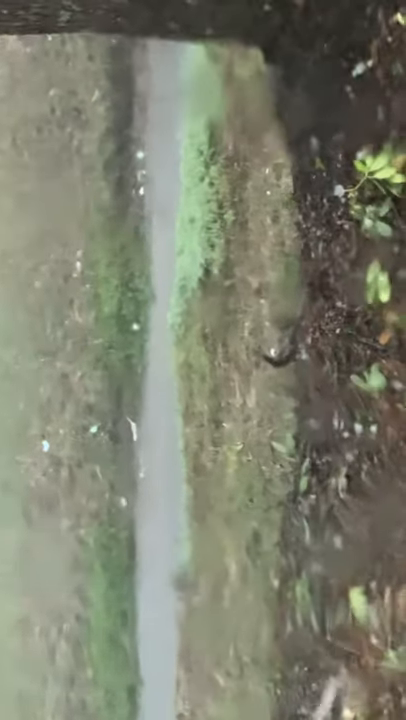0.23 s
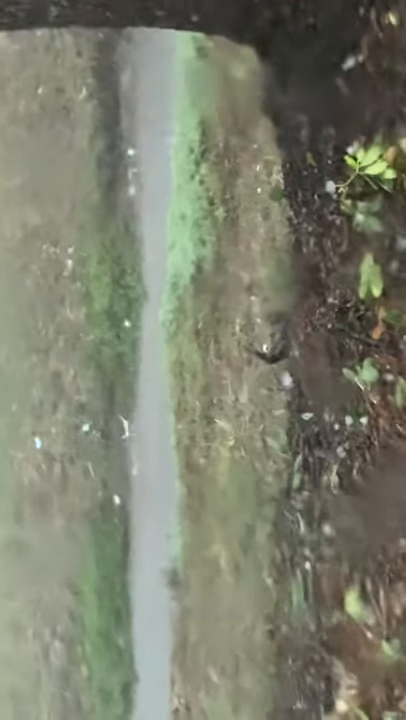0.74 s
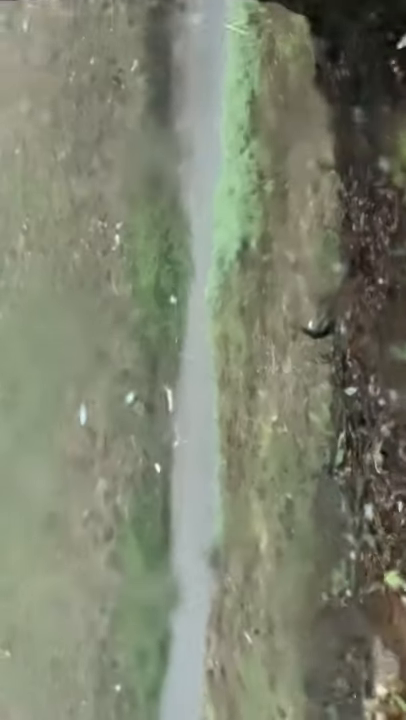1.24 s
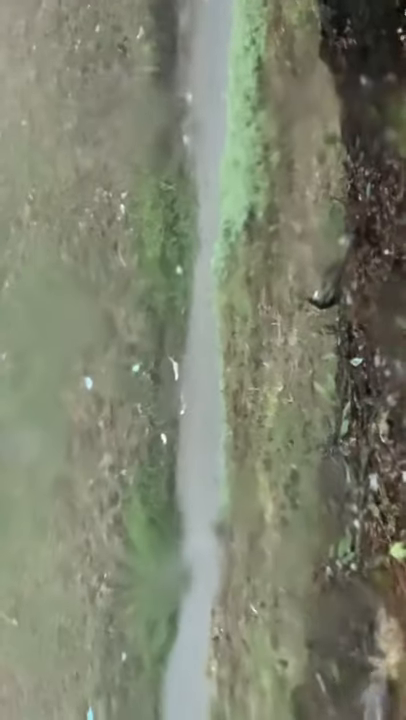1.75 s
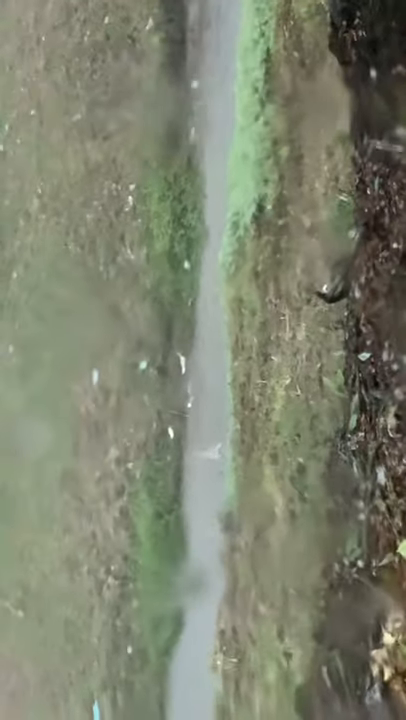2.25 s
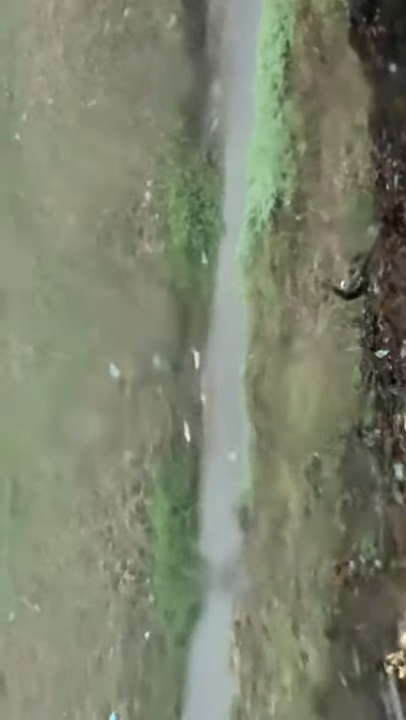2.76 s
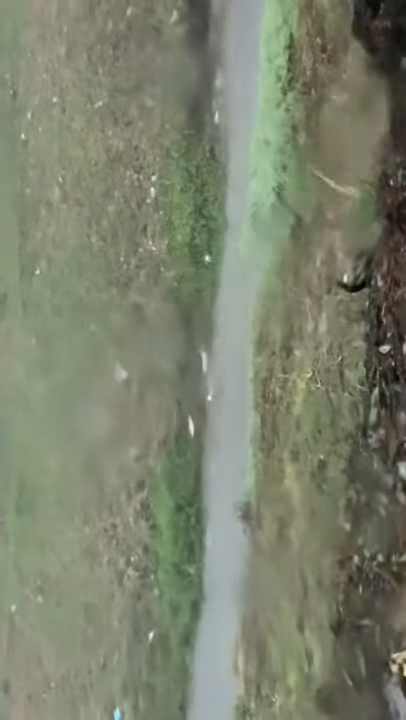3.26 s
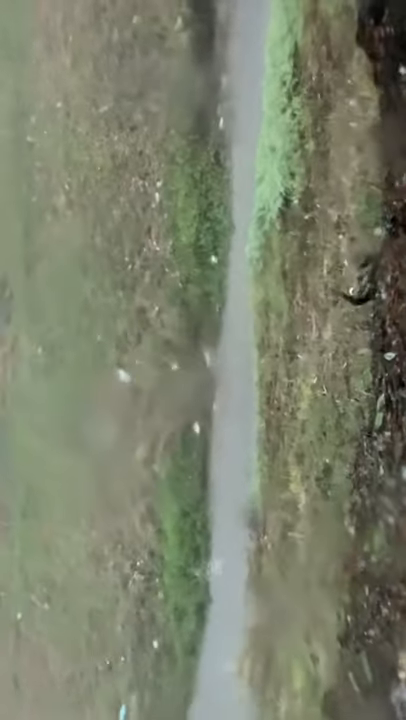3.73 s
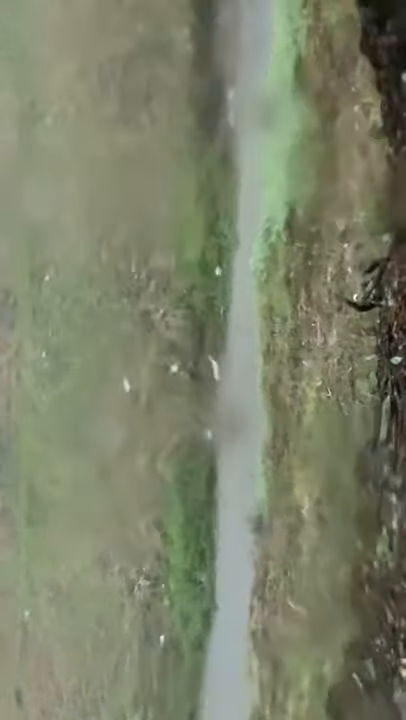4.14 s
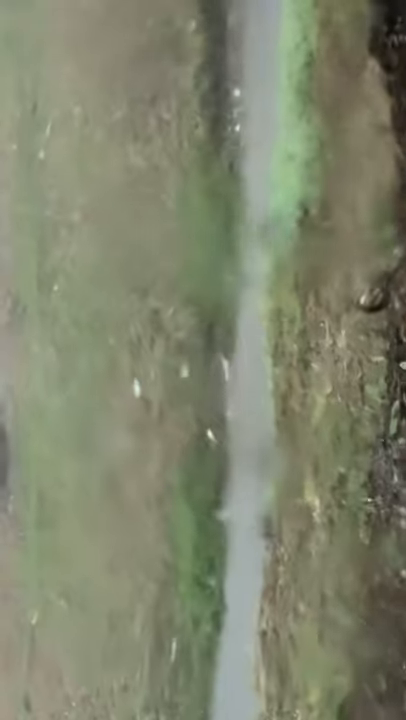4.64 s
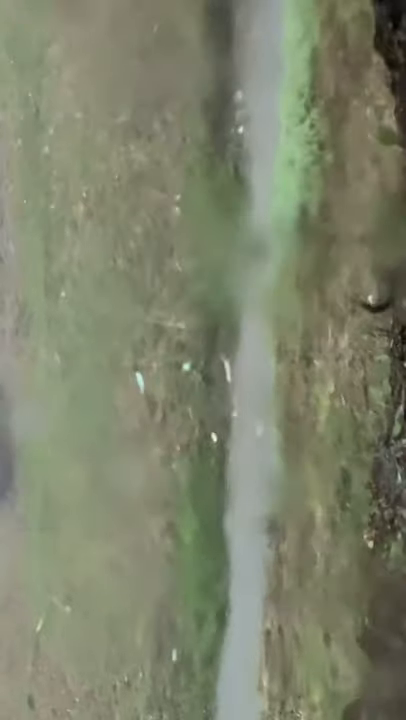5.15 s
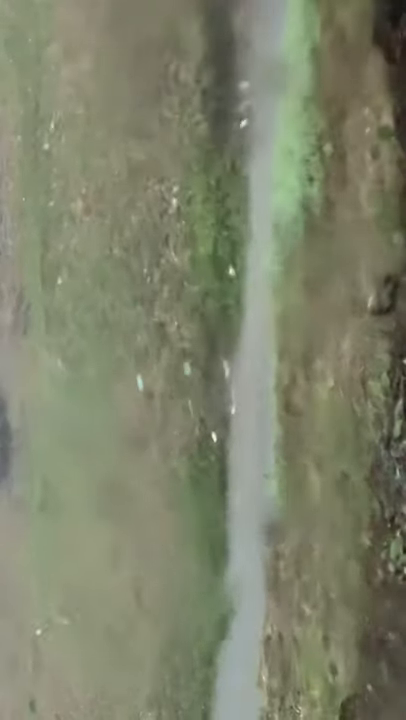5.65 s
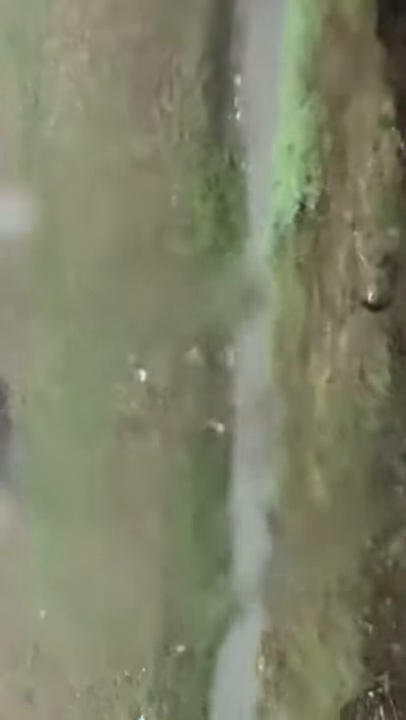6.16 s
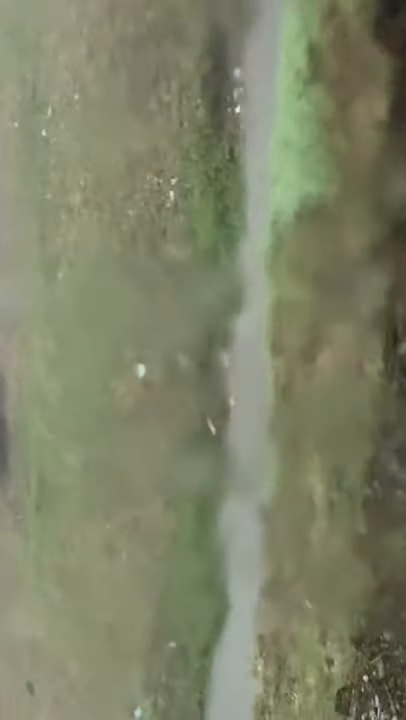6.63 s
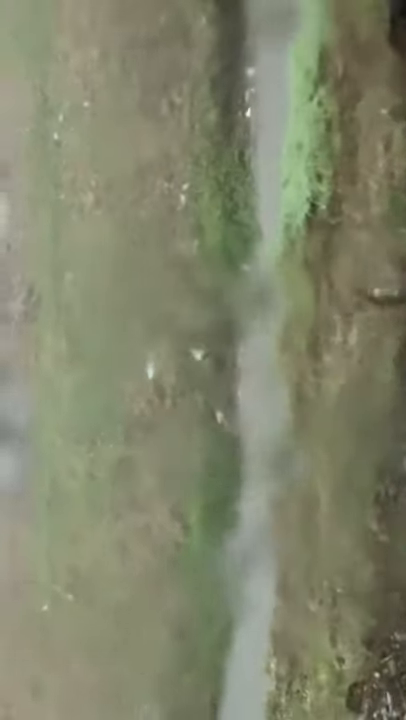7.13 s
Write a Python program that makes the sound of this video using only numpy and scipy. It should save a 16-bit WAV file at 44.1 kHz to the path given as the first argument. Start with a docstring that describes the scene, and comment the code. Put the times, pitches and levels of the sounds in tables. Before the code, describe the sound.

From inside a closed, parked car, rain makes a muffled, uneven rush and countless small hailstones drum the roof in a low, dense rumble, with fine pellets pattering and crackling on the glass. The first second is comparatively restrained, with soft thuds near 0.4 and 0.9, then a big boomy bang at 1.1. A sharper clack with cracking ice follows at 1.6, and a cluster of brittle window ticks around 2.0 to 2.4. Duller knocks come at 2.6 and 3.0, strong bangs at 3.15, 3.4 and 3.75; the sound dips briefly after 3.4. Ticks continue, then a heavy hit lands at 4.9, followed by scattered thuds from 5.2 to 5.5. Rain swells near 5.7, with busy icy tapping until 6.3. The brightest, hardest metal-and-glass bang strikes at 6.8, a smaller knock at 7.15, and the drumming thins by 7.4. Everything is close, wide and short-ringing, without echo.

```python
"""Hail on a parked car

Hail and heavy rain heard from inside the cabin by two close microphone ports. Rain is patchy filtered
noise; small stones drum the roof as random blows on panel modes. Large stones ring sheet metal and glass
modes with bursts of ice noise; small ones tick on the windows. A limiter holds the loudest peaks.
"""
import sys
import numpy as np
from scipy import signal
from scipy.fft import rfft, irfft, next_fast_len
from scipy.io import wavfile
from scipy.ndimage import uniform_filter1d, minimum_filter1d

SR = 44100
rng = np.random.default_rng(int(sys.argv[2]) if len(sys.argv) > 2 else 0)


def dump(signal):
    """Clip the signal to [-1, 1] and save it as 16-bit WAV at the path in sys.argv[1]."""
    limited = np.clip(np.atleast_2d(signal).T, -1, 1)
    pcm = np.round(limited * 32767).astype(np.int16)
    wavfile.write(sys.argv[1], SR, pcm)


N = 325899

# Rain hiss over time. Each row: time in seconds, treble level in dB.
HISS_LEVELS = [(0.0, -55.5), (0.64, -56.5), (1.34, -47), (1.89, -53.5), (2.06, -49.5), (2.22, -47.5),
               (2.72, -51.5), (3.27, -47), (3.4, -47.5), (3.6, -49), (3.85, -47), (4.43, -50.5),
               (4.84, -49.5), (5.39, -50), (5.7, -45), (6.13, -48), (6.73, -52), (7.39, -53.5)]
# Rain through closed windows. Each row: frequency in Hz, relative density in dB per Hz.
RAIN_COLOUR = [(150, -42), (400, 19.5), (900, 13.5), (1400, 13.5), (2400, -3), (4000, 1), (6500, -5),
               (9000, -23), (11500, -16.5), (13500, -22.5), (15500, -38)]
# Shower on the roof. Each row: time in seconds, drumming level in dB, level of the boom under it in dB.
SHOWER_LEVELS = [(0, -32.5, -26.5), (.35, -32.5, -28), (.66, -33, -22.5), (1.1, -27.5, -24.5),
                 (1.4, -29, -26), (1.75, -28.5, -24.5), (1.95, -33.5, -25), (2.2, -28.5, -25.5),
                 (2.7, -32.5, -29.5), (3.25, -26.5, -21), (3.8, -26.5, -29), (4.4, -29, -22.5),
                 (4.8, -28, -26), (5.31, -33, -27.5), (5.62, -25, -20.5), (5.95, -30.5, -23),
                 (6.3, -26, -26.5), (6.75, -32, -23.5), (7.05, -30, -28), (7.39, -38.5, -31)]
# Small stones on the glass. Each row: start in seconds, nominal levels of snap, shards and sharp edge in dB,
# ping level in dB, ping centre in Hz.
GLASS_TICKS = [(0.0324, -44, -41, -51, -49, 2980), (0.175, -44, -60, -70, -48, 1750),
               (1.231, -42, -51, -63, -47, 1680), (1.2895, -47, -52, -53, -45, 1910),
               (1.456, -40, -40, -56, -51, 1610), (1.604, -34, -34, -48, -49, 1740),
               (1.8, -30, -51, -77, -48, 1760), (2.0198, -48, -52, -66, -46, 3500),
               (2.0343, -41, -40, -49, -47, 3520), (2.054, -48, -43, -61, -39, 3680),
               (2.12, -35, -30, -40, -34, 4060), (2.162, -35.5, -37, -44, -45, 1720),
               (2.201, -46, -51, -45, -48, 1640), (2.2438, -37, -43, -44, -56, 2110),
               (2.349, -40, -42, -49, -44, 1770), (2.613, -38, -41, -47, -57, 1660),
               (2.9003, -42, -47, -62, -58, 3090), (3.042, -52, -57, -65, -43, 1710),
               (3.294, -41, -50, -49, -44, 1990), (3.309, -29.5, -43, -42, -33.5, 1750),
               (3.3284, -40, -45, -50, -35, 1790), (3.5034, -42, -51, -42, -56, 1940),
               (3.5234, -38, -45, -51, -50, 3100), (3.5874, -41, -49, -55, -34, 1710),
               (3.807, -33, -49, -64, -39, 1970), (3.8375, -45, -55, -63, -39, 1880),
               (3.909, -36, -42, -46, -38, 2020), (4.07, -34, -42, -55, -40, 1870),
               (4.1042, -34.5, -43, -51, -40, 1610), (4.127, -36, -53, -70, -44, 1680),
               (4.272, -45, -49, -57, -37, 1630), (4.317, -33.5, -46, -48, -45, 1710),
               (4.567, -34, -35, -40, -39, 1920), (4.6277, -40, -42, -55, -41, 1740),
               (4.7286, -35, -52, -46, -38, 1870), (4.8718, -46, -46, -58, -60, 3790),
               (4.9856, -45, -47, -49, -46, 1590), (5.102, -41, -44, -50, -46, 3000),
               (5.1433, -37, -52, -47, -34.5, 3430), (5.5089, -43, -44, -58, -36, 1650),
               (5.629, -42, -40, -47, -35.5, 1700), (5.757, -36, -33, -47, -49, 3200),
               (5.833, -29, -40, -60, -47, 3060), (5.8855, -31, -34, -53, -53, 1600),
               (5.93, -33, -37, -49, -37, 1930), (5.9893, -35, -41, -62, -51, 3510),
               (6.0237, -40, -52, -56, -50, 1920), (6.0506, -36, -56, -62, -53, 1860),
               (6.1143, -35, -39, -57, -52, 1960), (6.1639, -37, -45, -74, -45, 3420),
               (6.2083, -40, -32.5, -42, -39, 3680), (6.2145, -35, -35, -55, -38, 3660),
               (6.2524, -26.5, -39, -43.5, -40, 3700), (6.3624, -40, -41, -57, -42, 1740),
               (6.57, -52, -53, -53, -51, 1750), (6.6737, -46, -56, -58, -38, 1850),
               (7.2372, -38, -36.5, -57, -34, 3760), (7.285, -41, -46, -63, -66, 1820)]
# Soft thuds on the lined roof. Each row: start in seconds, nominal knock level in dB, knock centre in Hz,
# boom level in dB, boom centre in Hz.
ROOF_THUDS = [(0.409, -34, 550, -31, 102), (0.485, -43, 420, -30, 86), (0.868, -30, 433, -16, 134),
              (1.101, -8.5, 406, -2.5, 285), (1.119, -17, 398, -13, 265), (1.159, -20, 466, -14, 178),
              (1.626, -32, 620, -36, 100), (2.369, -50, 455, -20.5, 128), (2.762, -43, 579, -23.5, 100),
              (2.999, -24, 700, -29, 77), (3.134, -15.5, 536, -16.5, 250), (3.031, -37, 436, -28, 111),
              (3.095, -32, 754, -34, 105), (3.352, -33, 529, -17.5, 147), (4.243, -42, 604, -36, 100),
              (4.377, -27, 500, -33, 74), (5.164, -31, 645, -30, 73.4), (5.203, -22, 436, -20, 101),
              (5.253, -24.5, 510, -43, 65), (5.413, -24, 650, -22, 76), (5.468, -20.5, 526, -41, 61),
              (5.768, -45, 659, -16.5, 148), (5.857, -36, 600, -14, 100), (5.992, -49, 581, -18, 150),
              (6.05, -48, 382, -18, 150), (7.066, -50, 453, -22.5, 73.5), (7.129, -28, 649, -39, 78),
              (1.477, -24, 490, -43, 150), (3.703, -21, 420, -38, 150), (4.308, -21, 438, -36, 150),
              (5.27, -27, 850, -40, 150), (5.34, -24, 870, -37, 150), (5.511, -21.5, 580, -26, 150),
              (6.124, -18, 340, -30, 250), (6.269, -27.5, 636, -35, 150)]
# Hard bangs that reach the glass. Each row: start in seconds, nominal knock level in dB, knock centre in Hz,
# boom level in dB, boom centre in Hz, deadness of the spot 0-1, clack level in dB, clack centre in Hz,
# nominal levels of clink, snap and shards in dB.
HARD_BANGS = [(1.094, -18, 497, -8, 296, 0.3, -20.5, 1800, -45, -40, -31),
              (1.5899, -21, 651, -15.5, 220, 0.9, -16.5, 1980, -30, -14, -22),
              (2.597, -18, 390, -9, 216, 0.83, -36, 1250, -47, -45, -50),
              (3.141, -12.5, 475, -1.5, 263, 0.9, -29, 1210, -40, -33, -42),
              (3.156, -33, 552, -10.5, 140, 1, -33, 1290, -56, -55, -60),
              (3.3958, -4.5, 470, -10, 260, 0.68, -19, 1670, -25, -19, -23.5),
              (3.716, -26, 377, -22, 188, 0.7, -33.5, 1280, -65, -60, -65),
              (3.756, -12.5, 505, -15, 260, 0.8, -22.5, 1180, -47, -29, -31),
              (4.940, -6, 600, -2, 166, 0.62, -23, 2080, -38, -36, -42),
              (5.3199, -34, 694, -31, 79.4, 0.9, -27, 1650, -62, -28, -46),
              (5.798, -22, 680, -20, 115, 1, -51, 1350, -44, -33, -34),
              (6.646, -20.5, 760, -27.5, 80, 0.1, -33.5, 1650, -55, -30, -34.5),
              (6.8208, -3, 640, -2.5, 283, 0.62, -8.5, 1390, -11, -14, -13.5),
              (7.149, -24.5, 428, -33, 75, 0, -35.5, 1350, -51, -45, -45)]
# Modes of roof and door panels. Each row: frequency in Hz, relative level in dB, undamped t60 in seconds.
PANEL_MODES = [(47.5, 0, 0.9), (66, 7, 0.45), (86.5, 4, 0.36), (98, 0.5, 0.33), (128.5, 3.5, 0.34),
               (153.3, 4, 0.25), (178.4, -10.5, 0.32), (202.2, -2.5, 0.25), (249, -5, 0.21), (288, 0, 0.14),
               (341, 1, 0.13), (419, 0, 0.07), (472, 1, 0.15), (545.7, -2, 0.23), (644.5, 1.5, 0.11),
               (721, 0.5, 0.12), (791, 0, 0.17), (916, 0.5, 0.11)]
# Modes of window glass and trim. Each row: frequency in Hz, relative level in dB, undamped t60 in seconds.
GLASS_MODES = [(1120, 0, .06), (1290, 3, .08), (1495, 3, .08), (1650, 0, .06), (1815, 2, .06),
               (2050, 1, .05), (2270, -1, .05), (2700, -2, .045), (2990, 0, .045), (3120, 0, .04),
               (3290, 5, .06), (3550, -2, .04), (3790, 4, .05), (4150, -2, .04), (4650, 0, .04)]
# Bright snap of ice on glass. Each row: frequency in Hz, relative level in dB, t60 in seconds.
ICE_MODES = [(5200, -5, .012), (5940, 1, 0.013), (6130, -5.5, 0.012), (6680, 0.5, 0.0082),
             (7700, -1.5, 0.0062)]
# The two ports. Each row: frequency in Hz, likeness 0-1, right minus left in dB,
# extra turn of phase in half cycles.
PORT_RESPONSE = [(90, 1, 0, -0.03), (200, 1, 1.1, -0.025), (475, 0.94, 0.6, -0.12), (740, 0.53, 5, 0.14),
                 (1190, 0.38, 2.5, 0.27), (2330, .6, 0, 1), (3300, 0.57, 0, 0.86), (4360, 1, -0.5, 0.8),
                 (8000, .96, 0.2, 0.9), (16000, .95, 0, 1)]

RIGHT_LAG_S = 0.000231
TOP_HZ = 16000
THUD_DEADNESS, BANG_EDGE_DB = 0.36, -9  # deadness 0-1; nominal edge level relative to the shards
CLINK_HZ = 3320  # where the trim rings strongest
DIP_S, DIP_DB, DIP_FALL_S, DIP_HOLD_S, DIP_BACK_S = 3.415, -11.5, 0.035, 0.046, 0.1


def amp(db):
    """Gain of a level in dB."""
    return 10 ** (np.asarray(db) / 20)


def unit(x):
    """x at rms 1."""
    return x / np.sqrt(np.mean(x ** 2) + 1e-20)


def along(points, hz):
    """Each column after the first, interpolated on a log frequency axis."""
    f, *cols = np.transpose(points)
    return [np.interp(np.log(hz + 1), np.log(f + 1), c) for c in cols]


def over_time(points):
    """Each column after the first, interpolated at every sample."""
    s, *cols = np.transpose(points)
    return [np.interp(np.arange(N) / SR, s, c) for c in cols]


def filtered(x, response):
    """x times a complex response of frequency."""
    m = next_fast_len(N + SR // 2)
    return irfft(rfft(x, m) * response(np.fft.rfftfreq(m, 1 / SR)), m)[..., :N]


def band(x, lo_hz, hi_hz):
    """Causal band-pass."""
    return signal.sosfilt(signal.butter(2, [lo_hz, hi_hz], "bandpass", fs=SR, output="sos"), x)


def soft(x, top_hz):
    """Low-pass: sheet metal and lining let no sharp edge through."""
    return signal.sosfilt(signal.butter(2, top_hz, fs=SR, output="sos"), x)


def spikes(s, size):
    """Impulses of the given sizes at times s."""
    return np.bincount(np.clip((np.asarray(s) * SR).astype(int), 0, N - 1), size, N)


def dying(blows, t60_s, rise_s):
    """Envelope that climbs quickly at each blow and dies away."""
    fall, rise = amp(-60 / (t60_s * SR)), np.exp(-1 / (rise_s * SR))
    return signal.lfilter([1 - rise], np.convolve([1, -fall], [1, -rise]), blows)


def puff(s, db, lo_hz, hi_hz, t60_s, rise_s):
    """Bursts of band noise at times s, in two unrelated fields."""
    noise = rng.standard_normal((2, N))
    burst = noise * dying(spikes(s, amp(db)), t60_s, rise_s)
    return band(burst, lo_hz, hi_hz) / np.std(band(noise[0], lo_hz, hi_hz))


def ring(blows, hz, t60_s):
    """One mode struck by impulses: a two-pole resonator, unit blow to unit swing."""
    r, w = amp(-60 / (t60_s * SR)), 2 * np.pi * hz / SR
    return signal.lfilter([0, np.sin(w)], [1, -2 * r * np.cos(w), r * r], blows)


def struck(modes, s, db, centre_hz, dead, octaves, spread_s, damping=0.43, swell=None):
    """Blows ring the modes nearest their centre; a dead, lined spot cuts the ring short."""
    out = np.zeros((2, N))
    for hz, level_db, t60_s in modes:
        luck = rng.standard_normal((len(s), 3))
        off_octaves = np.log2(hz / centre_hz) / octaves
        size = amp(db + level_db) * np.exp(-0.5 * off_octaves ** 2)
        # the bending wave reaches each part at its own time
        late = s + spread_s * np.abs(luck[:, :2].T)
        swing = size * np.array([np.ones(len(s)), np.sign(luck[:, 2])])
        parts = [(1 - dead, t60_s)]
        if np.any(dead):
            parts.append((dead, damping * t60_s))
        if swell:
            parts.append((-1.22, swell * t60_s))  # short opposing part: the ring swells briefly
        for share, life_s in parts:
            blows = np.array([spikes(t, share * a) for t, a in zip(late, swing)])
            out += ring(blows, hz, life_s)
    return out


def splinter(s, snap_db, shards_db, edge_db):
    """Ice breaking: a short ringing snap, noisy shards, and a sharp edge with its own spray."""
    snap = np.zeros((2, N))
    for hz, db, t60_s in ICE_MODES:
        luck = rng.standard_normal((2, len(s)))
        blows = []
        for field in range(2):
            late = s + 0.00035 * np.abs(luck[field])
            blows.append(spikes(late, amp(snap_db + db - 6 + 5.6 * luck[1 - field])))
        snap += ring(np.array(blows), hz, t60_s)
    shards = puff(s, shards_db, 3400, 7930, t60_s=0.052, rise_s=0.0039)
    edge = puff(s, edge_db + 6, 9200, 13200, t60_s=0.012, rise_s=0.00045)
    spray = puff(s, edge_db - 7.5, 7700, 14000, t60_s=0.05, rise_s=0.0031)
    return band(snap, 4500, 9000) + shards + edge + spray


def rain(patchy_db=3.0, patter=0.59):
    """Hiss patchy in time and frequency, stirred by a quick patter of drops and pellets."""
    z = signal.stft(rng.standard_normal((2, N)), nperseg=512)[2]
    patches = rng.standard_normal(z.shape[1:])
    for axis in (0, 1):
        patches = uniform_filter1d(patches, size=8, axis=axis)
    hiss = signal.istft(z * amp(patchy_db * unit(patches)), nperseg=512)[1][:, :N]
    drops = rng.random((500, 2))
    blows = spikes(drops[:, 0] * N / SR, amp(15 * drops[:, 1] ** 2))
    pelt = unit(dying(blows, t60_s=0.08, rise_s=0.003)) * rng.standard_normal((2, N))
    wet = filtered(unit(hiss) + patter * pelt, lambda hz: amp(along(RAIN_COLOUR, hz)[0]))
    return amp(over_time(HISS_LEVELS)[0]) * wet / np.std(band(wet[0], 2270, 9500))  # level set by the treble


def grit(level_db=-7, per_s=90, swing_db=13):
    """Specks of ice crackle on the glass: noise bursts at random intervals; level follows the hiss."""
    luck = rng.random((900, 2))
    s = np.cumsum(-np.log(luck[:, 0])) / per_s
    keep = s < N / SR
    crackle = puff(s[keep], swing_db * luck[keep, 1] ** 2, 4500, 9430, t60_s=0.085, rise_s=0.00065)
    return amp(over_time(HISS_LEVELS)[0] + level_db) * unit(crackle)


def pellets(level_db=-5.5, octaves=0.46, swing_db=21):
    """Fine pellets, a few hundred a second, ring the pane modes; level follows the hiss."""
    luck = rng.random((2000, 3))
    s, size_db = luck[:, 0] * N / SR, swing_db * luck[:, 1] ** 2
    centre_hz = 1000 * 4.5 ** luck[:, 2]
    patter = struck(GLASS_MODES, s, size_db, centre_hz, dead=0, octaves=octaves, spread_s=0.0022)
    return amp(over_time(HISS_LEVELS)[0] + level_db) * unit(band(patter, 1150, 4600))


def ticks():
    """Small stones splinter on the windows, with a short dry ping of the pane."""
    s, snap_db, shards_db, edge_db, ping_db, ping_hz = np.transpose(GLASS_TICKS)
    ping = struck(GLASS_MODES, s, ping_db, ping_hz, dead=0.81, octaves=0.092, spread_s=0.00052)
    return splinter(s, snap_db, shards_db, edge_db) + band(ping, 1070, 6600)


def drumming(split_hz=235, damping=0.26):
    """A thousand small stones a second, each striking every panel mode at its own strength."""
    drum_db, boom_db = over_time(SHOWER_LEVELS)
    stones = rng.random((8000, 2))
    s, size = stones[:, 0] * N / SR, amp(9.8 * stones[:, 1] ** 2)
    low, high = np.zeros((2, 2, N))
    for hz, db, t60_s in PANEL_MODES:
        blows = np.array([spikes(s, size * rng.standard_normal(len(s))) for _ in range(2)])
        mode = amp(db) * unit(ring(blows, hz, damping * t60_s))  # running water damps the panels
        if hz < split_hz:
            low += mode
        else:
            high += mode
    boom = amp(boom_db) * unit(soft(low, 510))
    return boom + amp(drum_db) * unit(soft(soft(high, 1160), 1240))


def panels(s, knock_db, knock_hz, boom_db, boom_hz, dead, boom_top_hz=300, boom_lag_s=0.00089):
    """A stone knocks in the panels near where it lands; the slower boom follows and the lining shudders."""
    big = [m for m in PANEL_MODES if m[0] < boom_top_hz]
    small = [m for m in PANEL_MODES if m[0] > boom_top_hz]
    boom = struck(big, s + boom_lag_s, boom_db, boom_hz, dead, octaves=0.47, spread_s=0.0016, swell=0.041)
    knock = struck(small, s, knock_db - 3, knock_hz, dead, octaves=0.35, spread_s=0.00041)
    shudder = puff(s, knock_db - 5.5, 340, 737, t60_s=0.14, rise_s=0.003)
    return soft(boom, 680) + soft(soft(knock + shudder, 2250), 2400)


def bangs(clack_top_hz=2500):
    """Thuds sound in the panels alone; a hard stone also clacks and clinks in the glass and cracks apart."""
    s, *blow, clack_db, clack_hz, clink_db, snap_db, shards_db = np.transpose(HARD_BANGS)
    dead = blow[-1]
    thuds = [(*thud, THUD_DEADNESS) for thud in ROOF_THUDS]
    blows = np.vstack([np.transpose([s, *blow]), thuds])
    panes = [m for m in GLASS_MODES if m[0] < clack_top_hz]
    trim = [m for m in GLASS_MODES if m[0] > clack_top_hz]
    clack = struck(panes, s, clack_db, clack_hz, dead, octaves=0.12, spread_s=0.00075, swell=0.05)
    clink = struck(trim, s, clink_db, CLINK_HZ, dead, octaves=0.75, spread_s=0.00135, swell=0.04)
    glass = soft(band(clack, 680, 3000), 4000) + band(clink, 2660, 6400)
    # loose parts shake after the blow
    rattle = puff(s, clack_db + 0.5, 580, 1910, t60_s=0.042, rise_s=0.0045)
    rattle += puff(s, clink_db + 3.0, 3280, 3850, t60_s=0.025, rise_s=0.0022)
    return panels(*blows.T) + glass + rattle + splinter(s, snap_db, shards_db, shards_db + BANG_EDGE_DB)


def dip():
    """Gain of a brief dip after one bang: the level falls, holds and comes back."""
    corners_s = DIP_S + np.cumsum([0, DIP_FALL_S, DIP_HOLD_S, DIP_BACK_S])
    return amp(np.interp(np.arange(N) / SR, corners_s, [0, DIP_DB, DIP_DB, 0]))


def ports(fields):
    """The left port hears one field; the right a late copy of it blended with a second field."""
    def left_gain(hz):
        return amp(-along(PORT_RESPONSE, hz)[1] / 2)

    def right_blend(hz):
        alike, right_db, turn = along(PORT_RESPONSE, hz)
        alike = np.clip(alike, 0, 1)
        late = np.exp(-1j * (2 * np.pi * hz * RIGHT_LAG_S + np.pi * turn))
        return amp(right_db / 2) * np.array([alike * late, np.sqrt(1 - alike ** 2)])

    left = filtered(fields[0], left_gain)
    return np.array([left, filtered(fields, right_blend).sum(axis=0)])


def scene():
    """Everything that strikes the car, at the two ports."""
    return dip() * ports(rain() + grit() + pellets() + ticks() + drumming() + bangs())


def record(dry, bass_hz=47):
    """Bass roll-off, a limiter that looks ahead, and the band limit."""
    x = signal.sosfilt(signal.butter(5, bass_hz, "highpass", fs=SR, output="sos"), dry)
    need = np.minimum(1, 0.9 / (np.abs(x).max(axis=0) + 1e-9))
    gain = uniform_filter1d(minimum_filter1d(need, size=400), size=200)  # sizes in samples
    return filtered(x * gain, lambda hz: hz < TOP_HZ)


dry = scene()
out = record(dry)
dump(out)
```